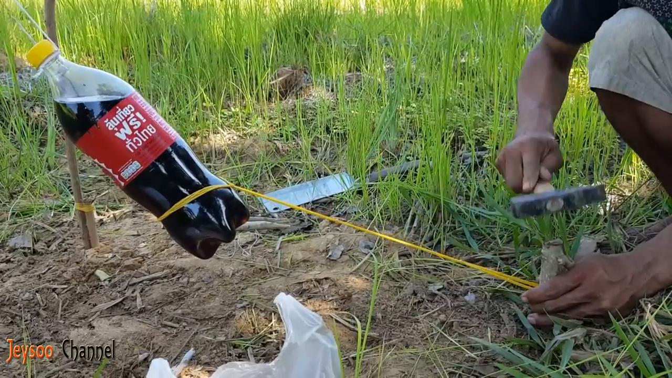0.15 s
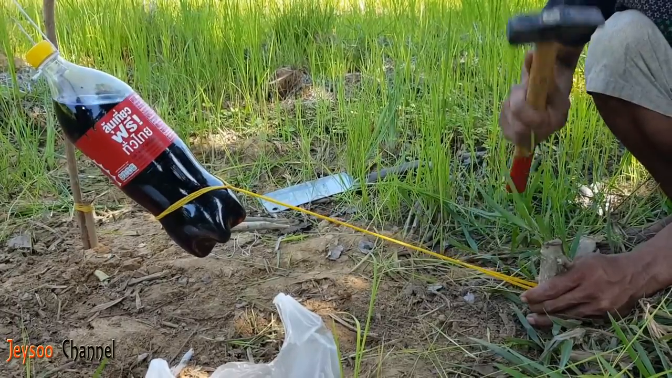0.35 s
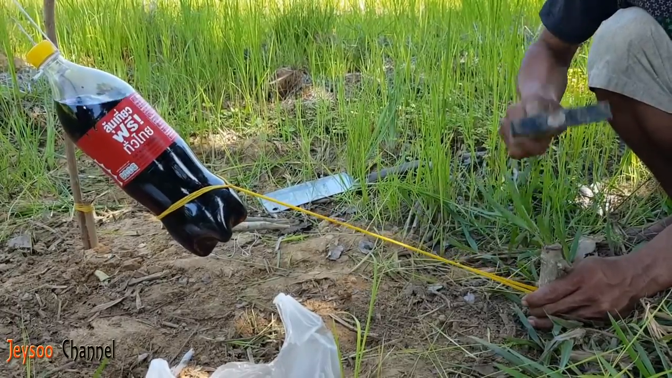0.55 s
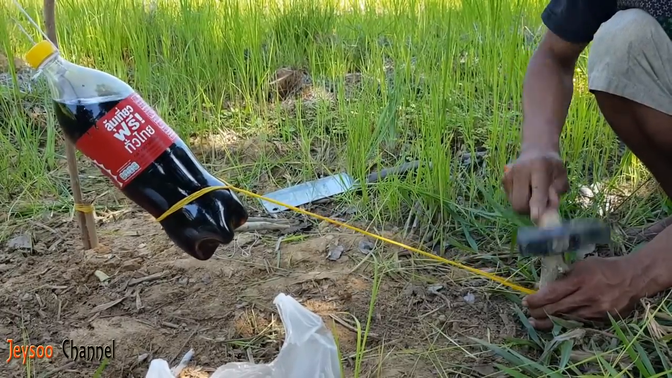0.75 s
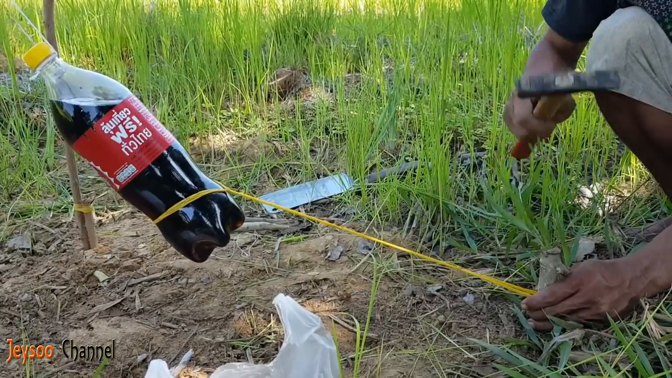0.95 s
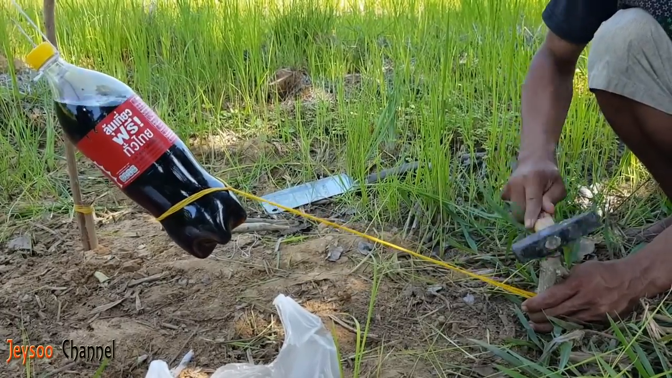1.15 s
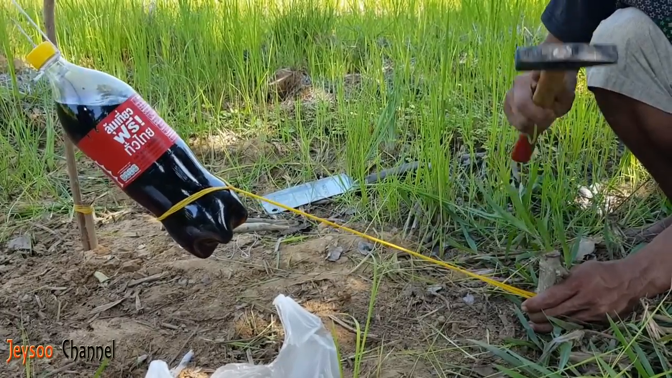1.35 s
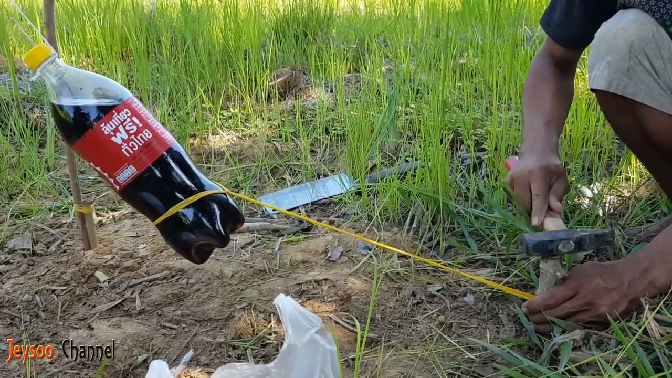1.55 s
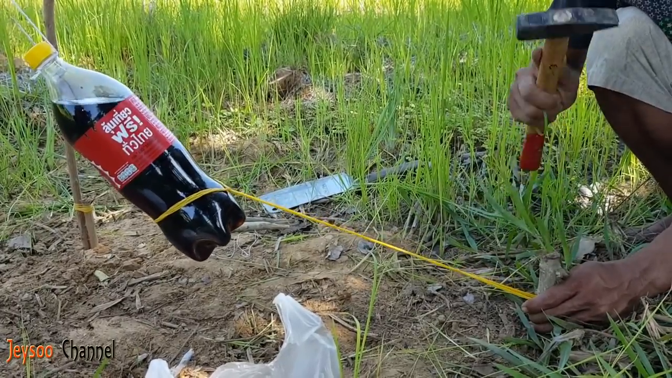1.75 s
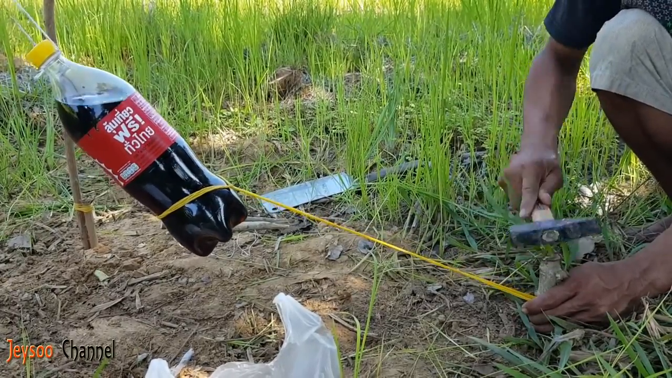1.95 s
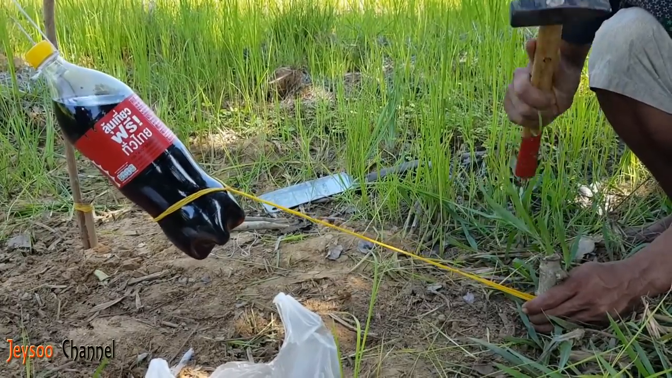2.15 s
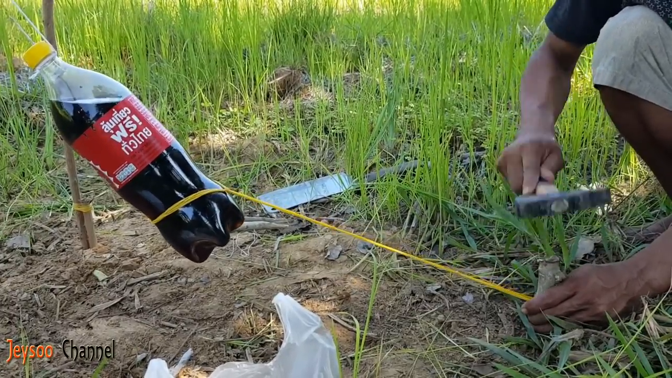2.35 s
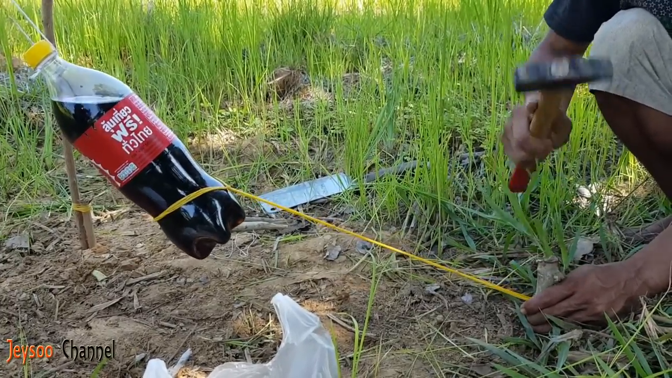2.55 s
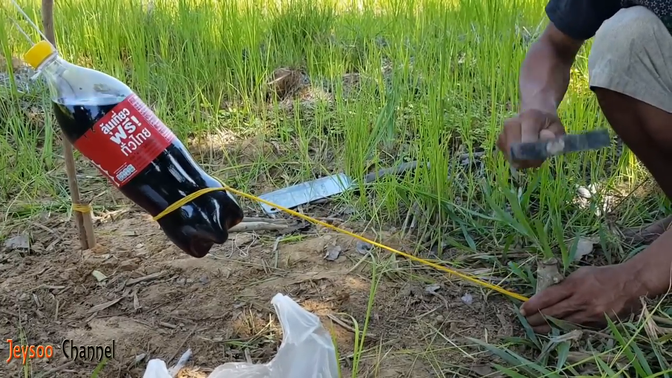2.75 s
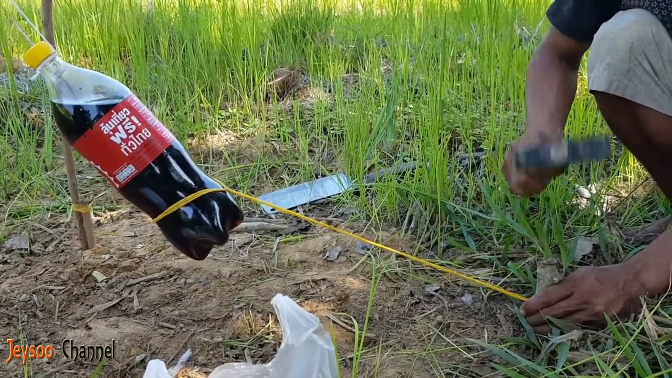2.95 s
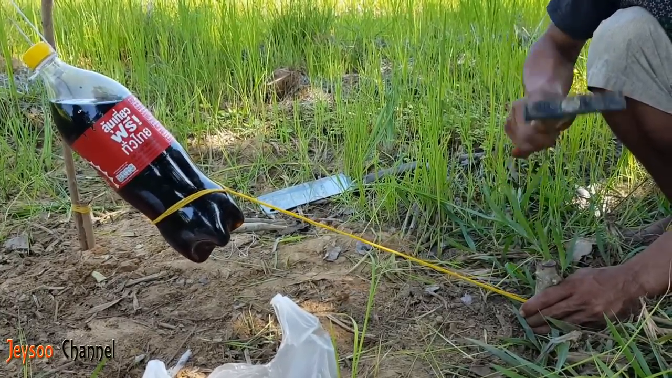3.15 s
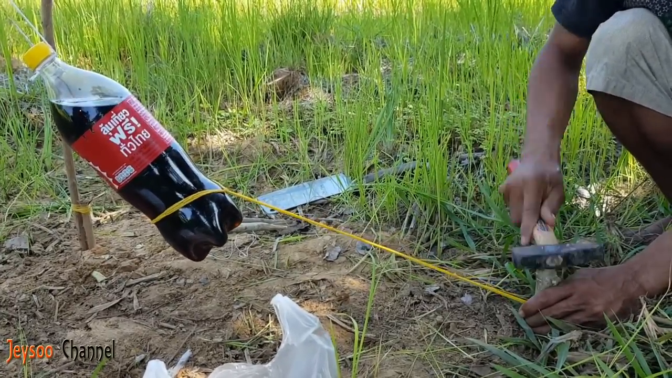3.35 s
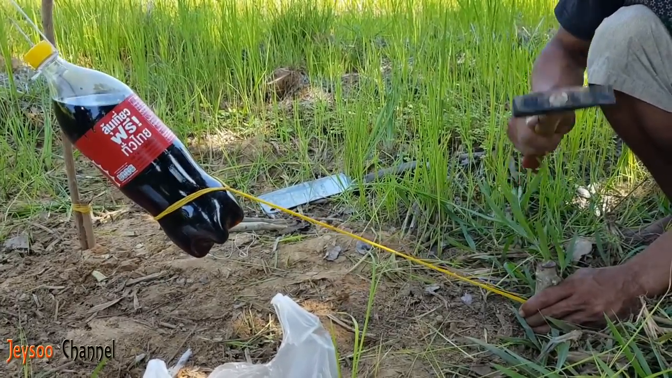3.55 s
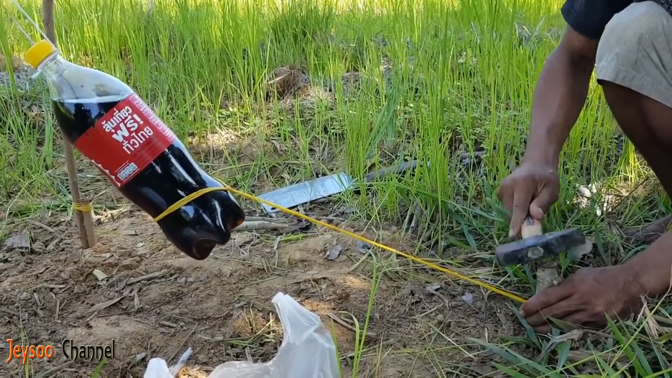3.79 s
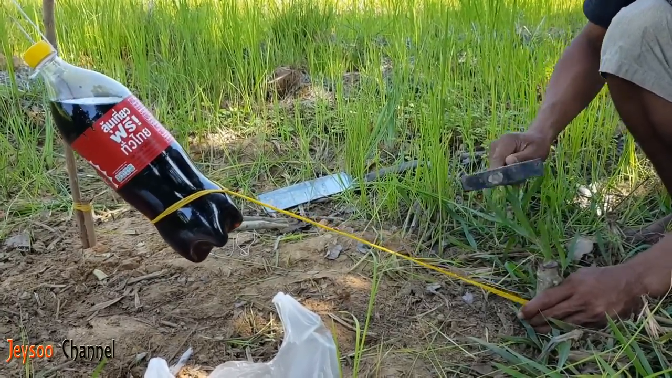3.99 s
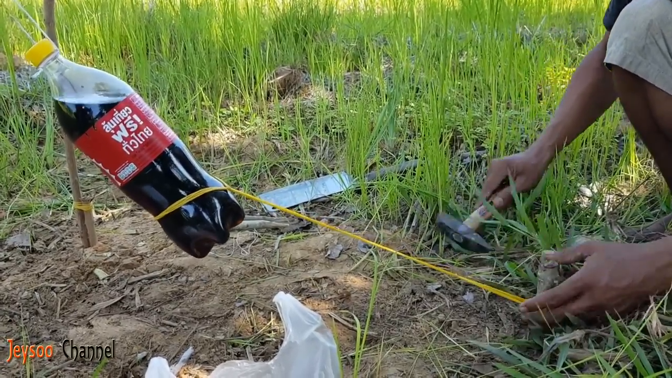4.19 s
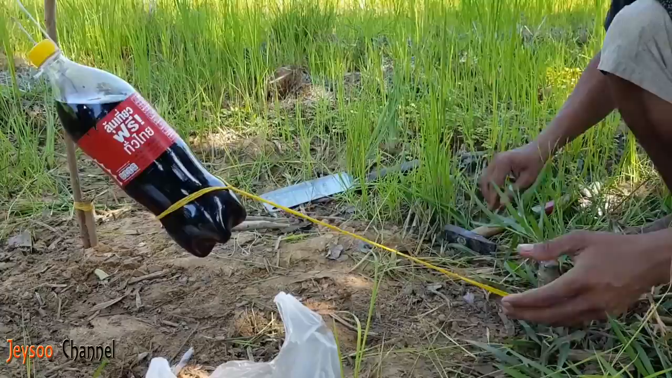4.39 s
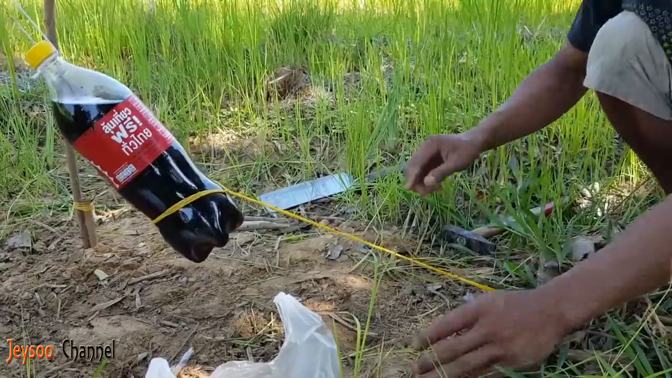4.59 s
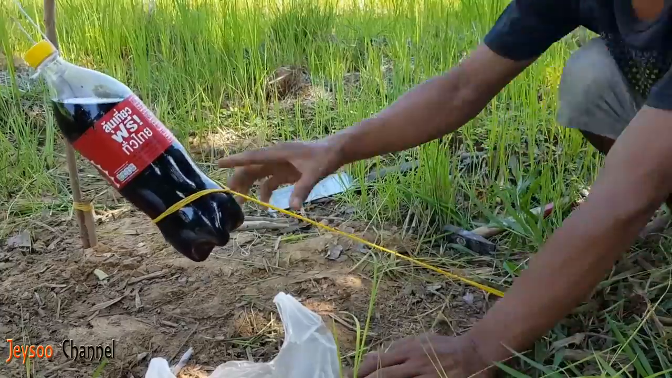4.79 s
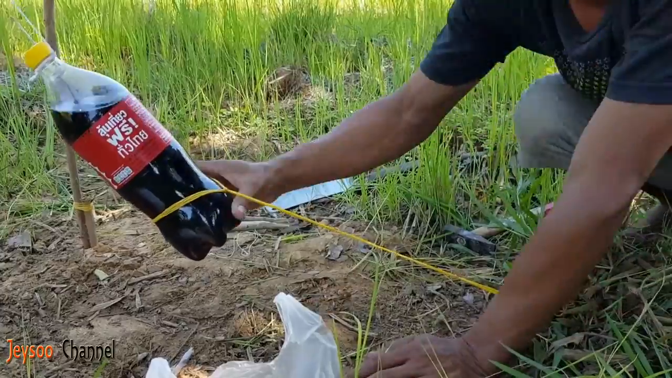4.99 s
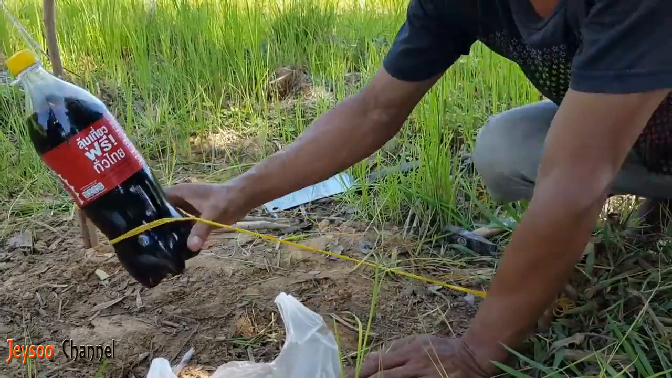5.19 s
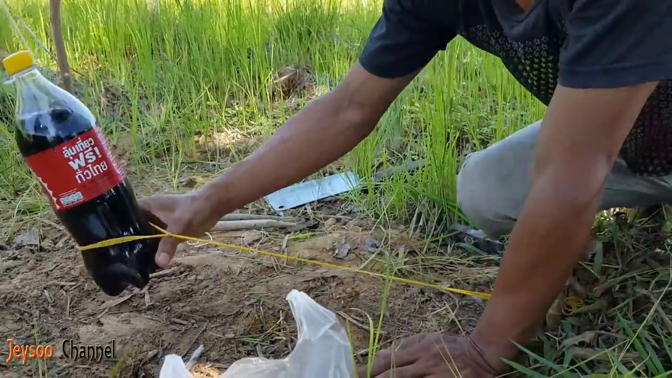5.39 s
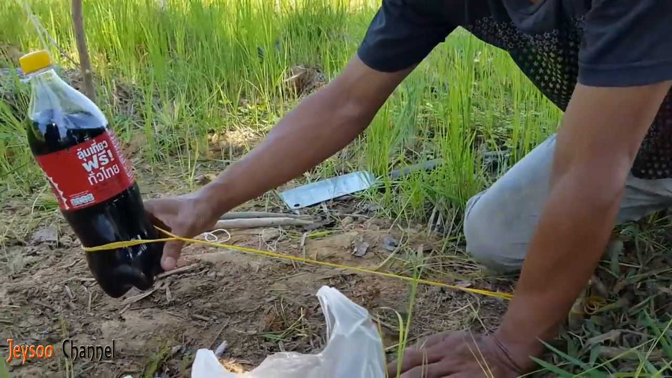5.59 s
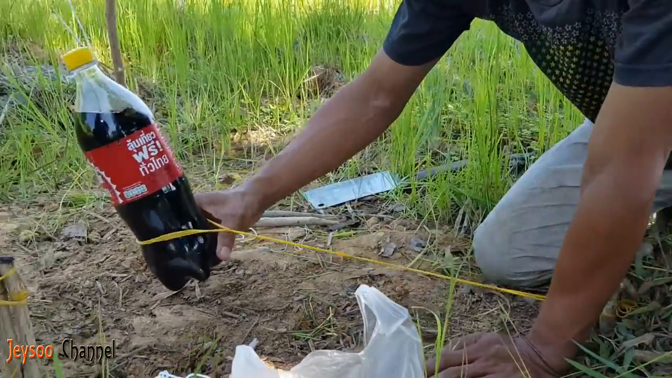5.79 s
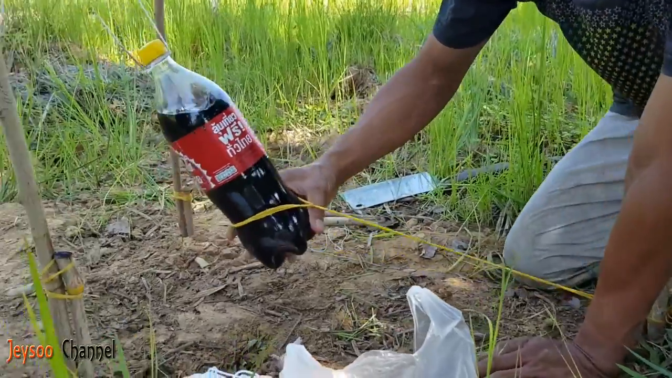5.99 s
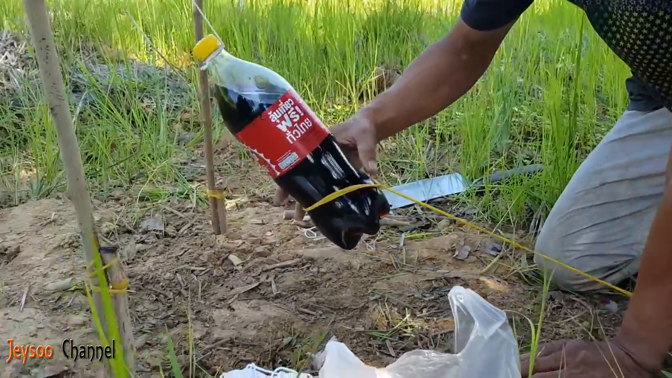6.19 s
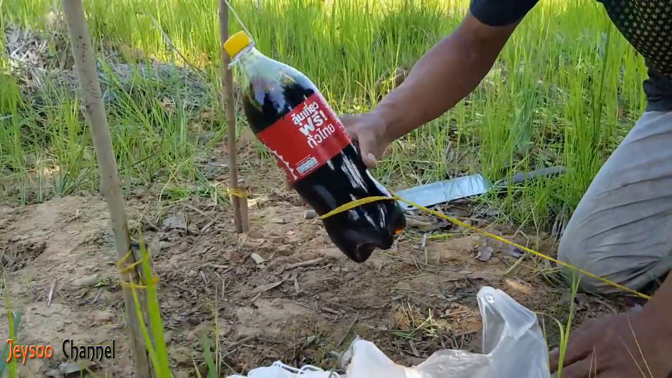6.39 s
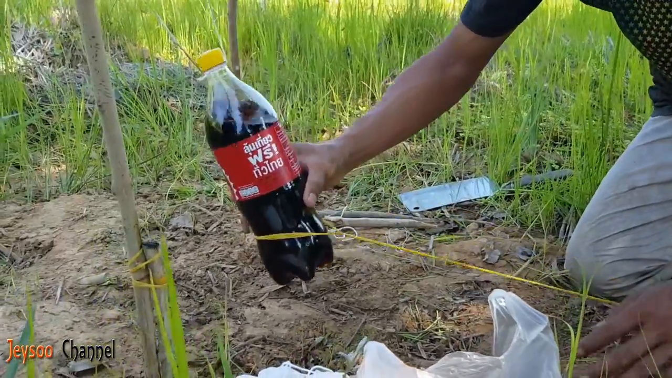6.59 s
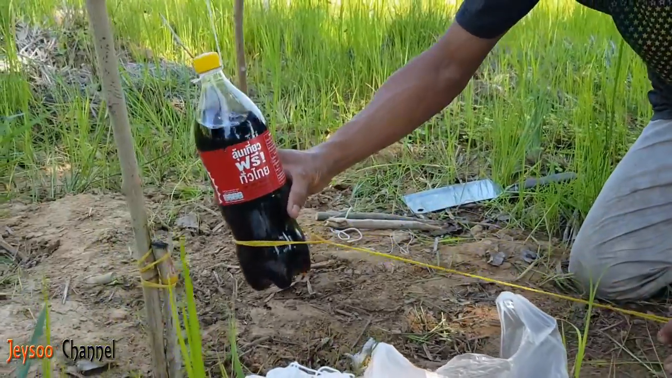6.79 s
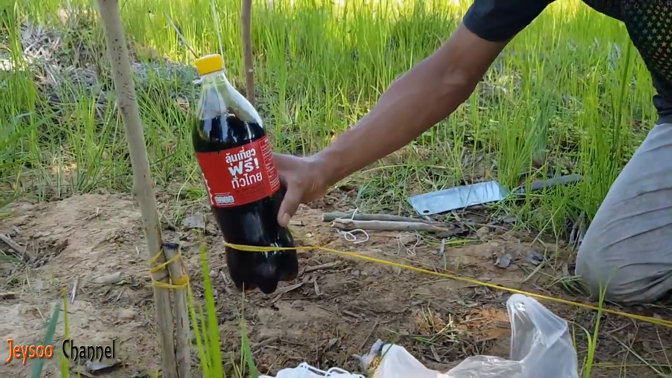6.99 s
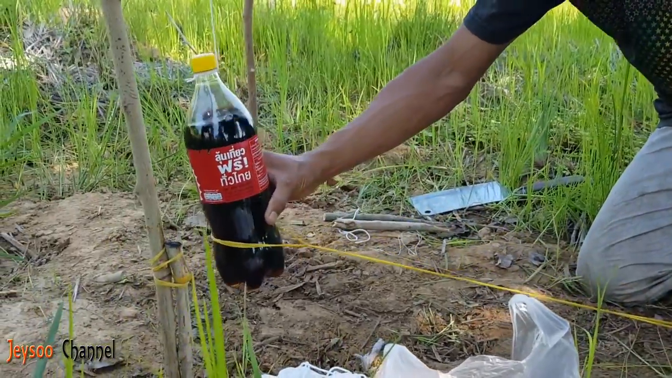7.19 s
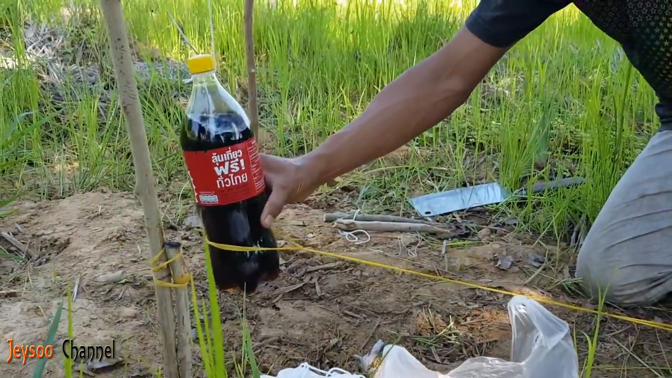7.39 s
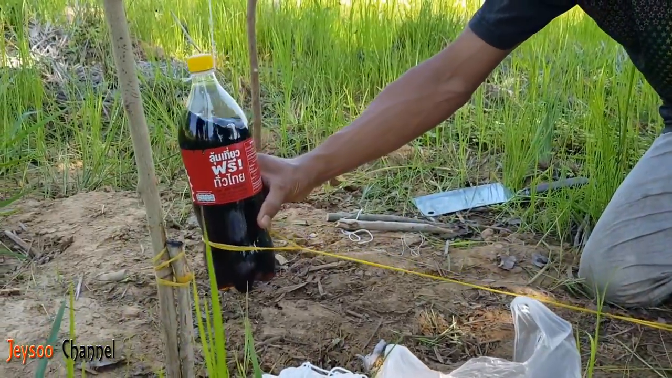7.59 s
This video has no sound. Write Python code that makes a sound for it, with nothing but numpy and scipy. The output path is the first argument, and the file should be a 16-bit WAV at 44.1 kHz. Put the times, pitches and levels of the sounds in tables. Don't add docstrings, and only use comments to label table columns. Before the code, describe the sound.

Open field, close stereo microphone, little reverberation beyond bird echoes off trees. A steady low rumble and faint high insect buzz run throughout. From 0.12 to 3.8 seconds a hammer strikes a wooden stake eleven times, about every 0.37 seconds: sharp crack, woody knock, short earthy thump, slight grit hiss, sometimes a tiny rebound tap. The first crack is sharpest; later blows thump harder. Birds whistle quick falling calls near 0.9, 2.3 and 3.7. From 3.8 grass and cloth rustle and dry stems tick; at about 4.27 the hammer lands softly in grass. Gentle brushing continues, with chips, a warble and trills around 5.3 to 5.7, then clearer falling whistles at 6.0 and 6.9. A distant vehicle roar swells faintly near 6.25. Stems crackle around 7.0, and a stronger rustle with a left-side snap closes at 7.6.

```python
import sys
import numpy as np
from scipy import signal
from scipy.fft import rfft, irfft
from scipy.io import wavfile
from scipy.ndimage import uniform_filter1d

SR = 44100
rng = np.random.default_rng(int(sys.argv[2]) if len(sys.argv) > 2 else 0)


def waveform_to_disk(signal):
    frames = np.transpose(np.atleast_2d(signal))
    scaled = np.clip(frames, -1, 1) * 32767
    samples = np.round(scaled).astype(np.int16)
    wavfile.write(sys.argv[1], SR, samples)


def natural_amplitude(level_db):
    exponent = np.asarray(level_db, float) / 20
    return 10 ** exponent


N = 336924

# (frequency [Hz], level [dB per Hz])
AIR_TONE = [(8.8, -49), (15, -22.5), (58, 2.5), (135, -7), (156, -22), (236, -32), (281, -24.5),
            (345, -43.5), (677, -40.5), (2460, -40.5), (4550, -39), (5110, -35.5), (8410, -37),
            (15100, -50.5), (16500, -61)]
# (frequency [Hz], correlation [-1..1])
PORT_LIKENESS = [(60, 0.99), (180, 0.84), (550, 0.12), (1650, -0.11), (4970, 0.02), (15000, 0.01)]
# (nearest time [s], level [dB], time to cover their own distance [s])
PASSES = [
    (3.7, -78.5, 1.1),
    (6.25, -74, .55),
]

# (centre [Hz], width [Hz], throb rate [Hz], throb depth [0-1], level [dB])
CICADAS = [(8370, 150, 21, .35, -0.5), (8350, 1200, 25, 0.1, -1.5), (7250, 380, 21, .3, -9),
           (6850, 4200, 30, 0.012, -2.5), (14600, 2600, 30, 0, -13)]
CRICKETS = [(5070, 270, 22, 0.2, -4.5), (5150, 600, 22, .2, -3), (6170, 900, 24, .2, -4.5)]
GRASSHOPPERS = [(2880, 200, 7.6, .3, 0), (2770, 700, 19, 0.4, -0.8)]
# (time [s], level [dB])
CICADA_EFFORT = [(0, -79), (1.5, -81), (2.3, -74.5), (3.5, -73), (4.8, -73.5), (5.45, -84), (6, -89.5),
                 (6.7, -84.5), (7.64, -77)]
CRICKET_EFFORT = [(0, -82.5), (1.2, -88), (1.9, -78.5), (2.2, -77), (3.1, -80), (4.399, -75.5),
                  (5.2, -75.5), (5.5, -74.5), (6.9, -72.5), (7.25, -76), (7.64, -79)]
GRASSHOPPER_EFFORT = [(5.7, -100), (6, -81), (6.6, -82.5), (7.199, -76), (7.64, -77.5)]

# (time [s], pitch [Hz], level [dB])
SHORT_CALL = [(0, 4500, -3.5), (.03, 4240, 6), (.07, 3830, 4), (.11, 3660, -10.5)]
LONG_CALL = [(0, 5250, -10), (.015, 4850, -3), (.035, 4050, 1), (.06, 3450, -1), (.09, 2850, 0),
             (.11, 2720, -2), (.135, 2760, -14)]
FAR_CALL = [(0, 4910, -8), (.04, 4280, 3), (.09, 3600, -5), (.14, 2982, -8.5)]
# (time [s], direct level [dB], stretch [x], echo level [dB], echo t60 [s])
SHORT_CALLS = [
    (0.001, -99, 0.46, -76, 0.39),
    (.242, -71, 0.48, -69.5, .3),
    (1.455, -76, 0.84, -73.5, 0.22),
    (1.8, -99, 1.15, -82, 0.55),
    (3.585, -78.5, 0.74, -73.5, 0.34),
    (7.228, -79, 0.8, -72, .25),
]
LONG_CALLS = [
    (5.982, -61.5, 1.0, -62.5, .27),
    (6.898, -61, 1.03, -62.5, .24),
]
FAR_CALLS = [
    (2.665, -99, .8, -67.5, .55),
    (4.56, -99, 1.0, -66.5, 0.96),
]
TURNED_CALLS = [
    (.868, -60, 1.0, -58.5, .25),
    (2.255, -61, 1.0, -59, .27),
    (3.688, -61, .95, -59, .27),
]
# (start [s], length [s], first pitch [Hz], fold point [0-1], level [dB])
WARBLES = [
    (5.348, .11, 2330, 0.5, -64.5),
]
TRILLS = [
    (5.52, .055, 2595, 0.302, -64.5),
    (5.595, .135, 2060, .6, -65.5),
]
# (start [s], length [s], first pitch [Hz], last pitch [Hz], level [dB])
CHIPS = [
    (5.25, .035, 3480, 3400, -77),
    (5.312, 0.017, 3540, 3540, -68),
    (5.312, 0.021, 4800, 4600, -68.5),
    (5.34, .03, 3850, 4030, -72.5),
    (5.485, 0.032, 3770, 3950, -74.5),
    (6.57, 0.2, 1235, 1190, -82),
    (6.84, .1, 1178, 1200, -89),
    (4.06, 0.15, 1240, 1185, -87.5),
]

BLOW_TIMES = .1206, .4697, .8274, 1.1993, 1.568, 1.9431, 2.3138, 2.6675, 3.0487, 3.4225, 3.7947
# (thump [dB], crack [dB], end-grain knock [dB], landing offset from centre [-1..1])
BLOWS = [(-15.5, -20.5, -21.5, -.1), (-14.5, -26, -21.5, -0.47), (-15, -29.5, -22, 0.91),
         (-13.5, -35, -20, 0.51), (-12.5, -30, -20, -.1), (-10.5, -26.5, -21.5, 0.029),
         (-9, -28.5, -17.5, -.7), (-9.5, -31, -20.5, -.5), (-9, -28.5, -15.5, .3), (-8.5, -28, -20.5, -0.9),
         (-9.5, -35.5, -22.5, -0.54)]
# (pitch [Hz], level [dB], t60 [s])
SOIL = [(107.6, 1.5, 0.051), (198.5, -5, 0.09), (248, 0, 0.052), (119, -15, 0.12), (226, -18.5, .13)]
STAKE = [(482, 8.5, 0.016), (700, -3.5, 0.019)]
FACE = [(948, -3, 0.018), (1190, 1.83, 0.017), (1673, -0.5, 0.014), (2052, -6, 0.022), (2540, -1, 0.022),
        (2950, -4, 0.023)]
# (each soil mode [ms]), (each stake mode [ms])
CRESTS_MS = (1.55, 4.4, 2.95, 1.55, 2.95), (2.15, 1.45)
PAIR_DB_PER_OFFSET = -5, 2.5, 2.5
# (frequency [Hz], level [dB per Hz])
CRACK_TONE = [(900, -26), (1600, -2.5), (2500, -4), (3400, -8.5), (4800, -4.5), (6500, -11.5), (9000, -14),
              (12000, -21), (16000, -36), (17500, -71.5)]
SCATTER_TONE = [(180, -28.5), (300, -5.5), (496, -20), (807, -25.5), (2440, -19), (3300, -25.5),
                (5460, -27.5), (7130, -39), (15200, -45), (16500, -62)]
# (time [s], level [dB])
BOUNCES = [(0.15, -39.5), (0.501, -42.5), (0.857, -29), (1.23, -48), (1.603, -28), (1.978, -44.5),
           (2.344, -32), (2.707, -36), (3.079, -48.5), (3.454, -52.5), (3.83, -52)]
# (time [s], level [dB], t60 [s])
SET_DOWN = [
    (4.26, -49, 0.24),
    (4.277, -40, 0.081),
]
# (frequency [Hz], level [dB per Hz])
SET_DOWN_TONE = [(53, -30), (90, 13.5), (172, -0.5), (248, -14), (672, -27), (860, -13.5), (1010, -11.5),
                 (2000, -36), (2600, -66), (4400, -120)]

# (peak [s], level [dB], 20 dB rise [s], 20 dB fall [s], scuff over it [dB])
BRUSHES = [(3.845, -68, .02, 0.16, -11), (4.04, -72, 0.24, 0.18, -19), (4.17, -75, 0.26, .3, -16),
           (4.28, -57.5, 0.052, 0.081, -13), (4.38, -64.5, .3, 0.18, -12.5), (4.45, -70.5, 0.3, 0.067, -13),
           (4.6, -78, .6, .6, -18), (4.869, -69.5, 0.27, .3, -8.5), (4.97, -69.5, .2, 0.16, -19.5),
           (5.8, -80.5, 2.5, 1.5, -1.5), (6.33, -71.5, 0.32, 0.062, -8.5), (6.62, -74, 0.51, 0.64, -4),
           (7.0, -68, 0.083, 0.13, -11), (7.25, -74, 1.2, 1.2, -9.5), (7.599, -54, 0.032, .3, -12.5),
           (7.65, -51.5, 0.055, .1, -19.5)]
# (frequency [Hz], level [dB per Hz])
RUSTLE_TONE = [(880, -37.5), (1500, -17), (5050, -3.5), (7180, -8.5), (8680, -2), (12700, -5), (15700, -9),
               (16500, -25.5)]
# (time [s], level [dB], left over right [dB], centre [Hz])
SNAPS = [
    (3.8346, -43, 3, 12100),
    (3.901, -47, 6, 12100),
    (3.9674, -50.5, 1, 12240),
    (4.0337, -56, 0, 12000),
    (4.135, -52, -2, 12230),
    (4.227, -49.5, 0, 11940),
    (4.4108, -45.5, 5, 12030),
    (4.4286, -45, 1.5, 12030),
    (4.4445, -43, 1.0, 11990),
    (7.5925, -41.5, 13.5, 11840),
]
THICK_SNAPS = [
    (3.3687, -49.5, 4, 6500),
    (4.281, -51, 0, 900),
    (5.3144, -53, 6, 6500),
    (6.2494, -57, -6, 4500),
    (6.976, -57, 0, 720),
    (6.9761, -52, -0.5, 6500),
    (7.0, -47.5, -1.5, 6400),
    (7.0135, -53, 0, 6500),
    (7.0253, -48.5, -6, 6500),
    (7.593, -55, 3, 900),
]

AIR_DB, ROAD_FLOOR_DB = -55.5, -86.5
TURNED_DB_PER_OCTAVE = 12.0
ARCH_DB = -13
FOLD_UP, SAG, DROP_SHARE = 1.27, 0.34, 0.45
TRILL_HZ, TRILL_DEPTH = 61, 0.033
PORT_LAG = 5.5
RING_DB, RING_PER_KNOCK = -11, 0.1
SCATTER_DB, SCATTER_PER_CRACK = -43, 0.2
HARD_DB_PER_OCTAVE = -0.27
STIFF_LOOSE, STIFF_SET, SET_AFTER_S = 0.93, 1.03, 2.2
LOW_CUT_HZ, EDGE_HZ = 75, 16000
CEILING = 1.3


def evened(x):
    return x / np.sqrt(np.mean(x ** 2) + 1e-20)


def read(points, hz):
    f, value = np.transpose(points)
    return np.interp(np.log(hz + 1), np.log(f + 1), value)


def curve(rows):
    s, db = np.transpose(rows)
    return np.interp(np.arange(N) / SR, s, db, left=-140)


def add(mix, s, sound):
    part = mix[..., round(s * SR):][..., :sound.shape[-1]]
    part += sound[..., :part.shape[-1]]


def coloured(x, points):
    size = x.shape[-1]
    gain = natural_amplitude(read(points, np.fft.rfftfreq(size, 1 / SR)))
    return evened(irfft(rfft(x) * gain, size))


def band(x, hz, width):
    edges = np.clip([hz - width / 2, hz + width / 2], 20, 0.45 * SR)
    return evened(signal.sosfilt(signal.butter(3, edges, "bandpass", fs=SR, output="sos"), x))


def panned(x, pan_db):
    return x * natural_amplitude([[pan_db / 2], [-pan_db / 2]])


def ports(x, lag, pan_db=0):
    turn = np.exp(-2j * np.pi * lag * np.fft.rfftfreq(len(x)))
    return panned(np.array([irfft(rfft(x) * turn, len(x)), x]), pan_db)


def open_air():
    frames, hz = N // 512 + 5, np.fft.rfftfreq(2048, 1 / SR)
    a, b, c, d, patches = rng.standard_normal((frames, 1025, 5)).T
    patches = evened(uniform_filter1d(uniform_filter1d(patches, 20, 0), 8, 1))
    same = np.clip(read(PORT_LIKENESS, hz), -1, 1)[:, None]
    left = a + 1j * b
    right = same * left + np.sqrt(1 - same ** 2) * (c + 1j * d)
    z = np.array([left, right]) * natural_amplitude(read(AIR_TONE, hz)[:, None] + 1.4 * patches)
    return natural_amplitude(AIR_DB) * evened(signal.istft(z, nperseg=2048, noverlap=1536)[1][:, :N])


def road():
    t = np.arange(N) / SR
    power = natural_amplitude(2 * ROAD_FLOOR_DB)
    for s, db, span in PASSES:
        power = power + natural_amplitude(2 * db) / (1 + ((t - s) / span) ** 2) ** 2
    roar = rng.standard_normal((3, N))
    return np.sqrt(power) * band(roar[:2] + 0.8 * roar[2], 400, 500)


def insects():
    out = np.zeros((2, N))
    choirs = (CICADAS, CICADA_EFFORT), (CRICKETS, CRICKET_EFFORT), (GRASSHOPPERS, GRASSHOPPER_EFFORT)
    for choir, effort in choirs:
        for hz, width, rate, depth, db in choir:
            pace = rate * (1 + 0.25 * evened(uniform_filter1d(rng.standard_normal(N), 4000)))
            throb = 1 + np.clip(depth, 0, 0.4) * np.cos(2 * np.pi * np.cumsum(pace) / SR)
            wings = band(rng.standard_normal((2, N)), hz, width)
            out += natural_amplitude(curve(effort) + db + 3.5) * throb * wings
    return out


def whistle(rows, call_db, stretch, echo_db, t60, burr=0.58):
    s, hz, db = np.transpose(rows)
    s = (s - s[0]) * stretch
    t = np.arange(0, s[-1], 1 / SR)
    tone = np.sqrt(2) * np.sin(2 * np.pi * np.cumsum(np.interp(t, s, hz)) / SR)
    tone *= 1 + burr * evened(uniform_filter1d(rng.standard_normal(len(t)), 120))
    tone *= natural_amplitude(np.interp(t, s, db)) * signal.windows.tukey(len(t), 0.15)
    late = np.arange(20000) / SR
    trees = rng.standard_normal((2, len(late))) * natural_amplitude(-60 * late / t60)
    trees *= np.minimum(late / (0.04 * t60), 1)
    echoes = signal.fftconvolve(tone[None], trees / np.linalg.norm(trees[0]), axes=1)
    direct = ports(np.pad(tone, (0, len(late) - 1)), 0.62)
    return natural_amplitude(call_db) * direct + natural_amplitude(echo_db) * echoes


def chip(length, from_hz, to_hz, db):
    u = np.linspace(0, 1, 200)
    return np.transpose([u * length, from_hz + (to_hz - from_hz) * u, db + ARCH_DB * (2 * u - 1) ** 2])


def warble(length, from_hz, fold_at, db, trill_depth=0):
    s, _, level_db = chip(length, from_hz, from_hz, db).T
    top_hz = FOLD_UP * from_hz
    end_hz = top_hz * (1 - SAG * fold_at)
    turns = [0, fold_at, fold_at + DROP_SHARE * (1 - fold_at), 1]
    hz = np.interp(s / length, turns, [from_hz, top_hz, end_hz, end_hz])
    trill = trill_depth * np.sin(2 * np.pi * TRILL_HZ * s)
    return np.transpose([s, hz * (1 + trill), 0.81 * (level_db - db) + db + 90 * trill])


def trilled(*how):
    return warble(*how, trill_depth=TRILL_DEPTH)


def birds():
    out = np.zeros((2, N))
    turned = [(s, hz, db - TURNED_DB_PER_OCTAVE * abs(np.log2(hz / 4000))) for s, hz, db in LONG_CALL]
    callers = (LONG_CALL, LONG_CALLS), (SHORT_CALL, SHORT_CALLS), (FAR_CALL, FAR_CALLS), (turned, TURNED_CALLS)
    for shape, calls in callers:
        for s, *how in calls:
            add(out, s, whistle(shape, *how))
    for shape, notes in (warble, WARBLES), (trilled, TRILLS), (chip, CHIPS):
        for s, *how in notes:
            add(out, s, whistle(shape(*how), 0, 1, echo_db=-6, t60=0.2, burr=0.4))
    return out


def rings(t, modes, crests_ms, stiff):
    out = 0
    for (hz, db, t60), ms in zip(modes, crests_ms):
        out = out + natural_amplitude(db - 60 * t / t60) * np.cos(2 * np.pi * hz * stiff * (t - ms / 1000))
    return out


def patchy(x, patchy_db):
    z = signal.stft(x, nperseg=256)[2]
    lumps = uniform_filter1d(rng.standard_normal(z.shape[1:]), size=5, axis=0)
    lumps = evened(uniform_filter1d(lumps, size=4, axis=1))
    return evened(signal.istft(z * natural_amplitude(patchy_db * lumps), nperseg=256)[1][:, :x.shape[1]])


def scatter(t):
    hiss = patchy(coloured(rng.standard_normal((2, len(t))), SCATTER_TONE), patchy_db=3.0)
    hiss *= natural_amplitude(2.2 * evened(uniform_filter1d(rng.standard_normal(len(t)), 150)))
    burst_and_tail = np.exp(-(t / 0.037) ** 2) + natural_amplitude(-13 - 60 * t / 0.38)
    return hiss * (1 - np.exp(-(t / 0.008) ** 2)) * burst_and_tail


def blow(s, thump_db, crack_db, knock_db, offset):
    t = np.arange(16384) / SR
    stiff = STIFF_LOOSE + (STIFF_SET - STIFF_LOOSE) * min(s / SET_AFTER_S, 1)
    scatter_db = SCATTER_DB + SCATTER_PER_CRACK * (crack_db + 28) - thump_db
    hardness_db = HARD_DB_PER_OCTAVE * (crack_db + 29)
    crack_db, knock_db = crack_db - thump_db, knock_db - thump_db
    ring_db = RING_DB + RING_PER_KNOCK * (knock_db + 12)
    pairs_db = np.repeat(knock_db + offset * np.array(PAIR_DB_PER_OFFSET), 2)

    rise = 1 - np.exp(-(t / 0.0011) ** 2)
    thump = natural_amplitude(-2) * rings(t, SOIL, CRESTS_MS[0], stiff) * rise
    ring = natural_amplitude(ring_db + 6.0) * rings(t, STAKE, CRESTS_MS[1], stiff) * rise
    struck = [(hz * rng.uniform(1.0, 1.03), db + pair_db, t60) for (hz, db, t60), pair_db in zip(FACE, pairs_db)]
    knock = -rings(t, struck, np.full(len(FACE), 0.2), 0.93) * np.minimum(t / 0.00027, 1)
    snap = -natural_amplitude(crack_db + 8) * np.exp(-((t - 0.0002) / 0.00008) ** 2)
    tone = [(hz, db + hardness_db * np.log2(hz / 4000)) for hz, db in CRACK_TONE]
    splinters = coloured(rng.standard_normal((3, len(t))), tone)
    splinters *= natural_amplitude(crack_db + 9.5 - 60 * t / 0.017) * np.minimum(t / 0.0002, 1)

    near = ports(thump + ring + knock + snap + splinters[2], PORT_LAG, 0.2)
    near += natural_amplitude([[-2], [-5]]) * splinters[:2]
    fade = np.hanning(2 * len(t))[len(t):]
    return natural_amplitude(thump_db) * (near + natural_amplitude(scatter_db) * scatter(t)) * fade


def bounce(db):
    t = np.arange(4096) / SR
    tap = rings(t, SOIL[2:3] + STAKE + FACE[:1], (1.6, 0.79, 0.5, 0.4), 1.01) * np.minimum(t / 0.0006, 1)
    return natural_amplitude(db - 5.0) * ports(tap, PORT_LAG)


def set_down(db, t60):
    t = np.arange(4096) / SR
    thud = coloured(rng.standard_normal(len(t)), SET_DOWN_TONE)
    return ports(thud * natural_amplitude(db - 60 * t / t60) * np.minimum(t / 0.0016, 1), PORT_LAG)


def hammer():
    out = np.zeros((2, N))
    for s, strength in zip(BLOW_TIMES, BLOWS):
        add(out, s, blow(s, *strength))
    for s, db in BOUNCES:
        add(out, s, bounce(db))
    for s, db, t60 in SET_DOWN:
        add(out, s, set_down(db, t60))
    return signal.sosfilt(signal.butter(2, LOW_CUT_HZ, "highpass", fs=SR, output="sos"), out)


def brushing():
    peak_s, db, rise_s, fall_s, scuff_db = np.transpose(BRUSHES)[:, :, None]
    since = np.arange(0, N + 64, 64) / SR - peak_s
    power = natural_amplitude(db - 20 * np.maximum(since / fall_s, -since / rise_s)) ** 2

    def level(p):
        return np.interp(np.arange(N) / 64, np.arange(p.shape[1]), np.sqrt(p.sum(0)))

    grains = natural_amplitude(3.0 * np.minimum(rng.exponential(1, (2, N)), 4)) * rng.standard_normal((2, N))
    grains *= rng.random((2, N)) < 6000 / SR
    rub = level(power) * natural_amplitude(5.0) * panned(coloured(grains, RUSTLE_TONE), 3)
    scuff = rng.standard_normal((3, N))
    scuff = band(scuff[:2] + 0.68 * scuff[2], 1100, 1500)
    return rub + level(power * natural_amplitude(2 * scuff_db)) * natural_amplitude(1.0) * scuff


def stems():
    out, t = np.zeros((2, N)), np.arange(2048) / SR
    for s, db, pan_db, hz in SNAPS + THICK_SNAPS:
        snap = band(rng.standard_normal((2, len(t))), hz, 0.85 * hz)
        snap *= natural_amplitude(db - 1.5 - 60 * t / max(0.008, 30 / hz))
        add(out, s, panned(snap, pan_db))
    return out


def scene():
    return open_air() + road() + insects() + birds() + hammer() + brushing() + stems()


def roll_off(x):
    return signal.sosfilt(signal.butter(12, 16810, fs=SR, output="sos"), x)


def record(dry):
    held = CEILING * np.tanh(dry / CEILING)
    limited = signal.sosfilt(signal.butter(8, EDGE_HZ, fs=SR, output="sos"), held)
    return roll_off(limited)


dry = scene()
out = record(dry)
waveform_to_disk(out)
```